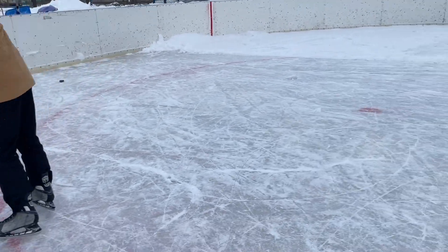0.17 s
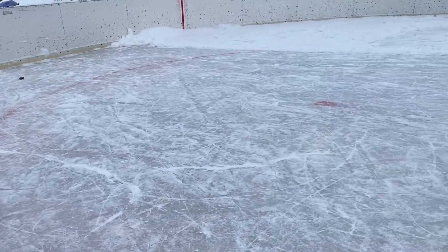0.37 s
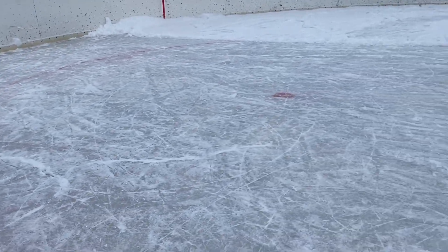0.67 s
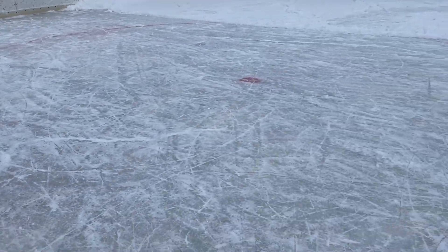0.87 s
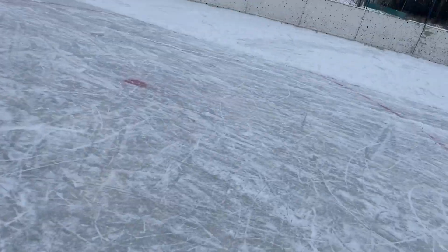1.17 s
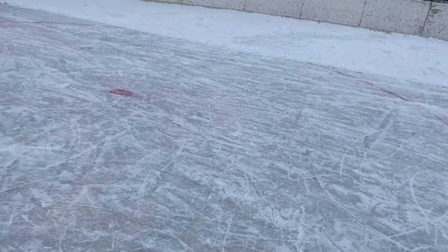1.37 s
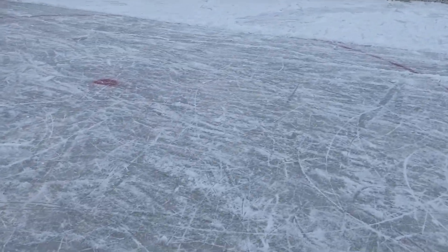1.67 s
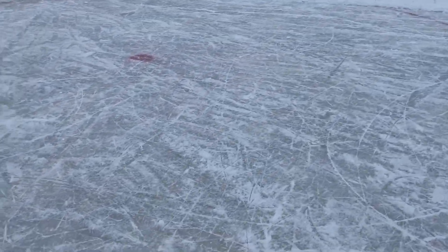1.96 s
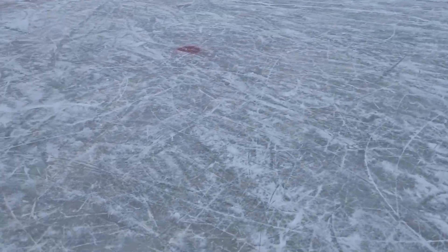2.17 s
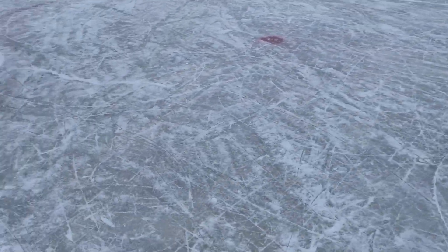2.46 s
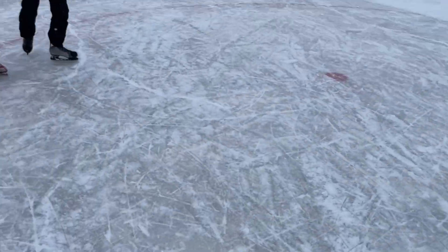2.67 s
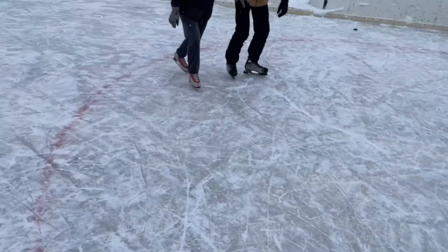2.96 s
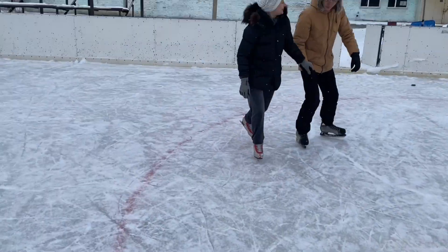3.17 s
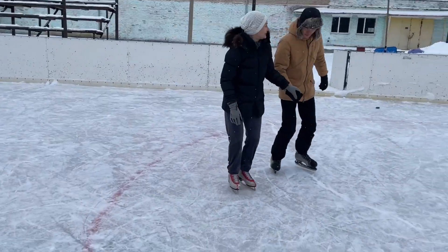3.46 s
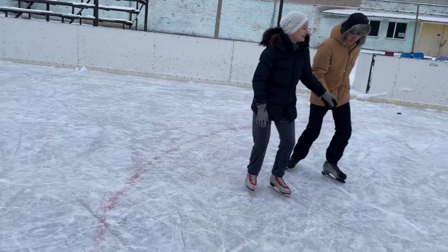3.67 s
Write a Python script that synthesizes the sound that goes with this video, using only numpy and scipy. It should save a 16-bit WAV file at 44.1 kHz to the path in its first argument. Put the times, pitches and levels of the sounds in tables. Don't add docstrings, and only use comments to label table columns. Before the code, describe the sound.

Skates scraping on outdoor ice in slow strokes, with dull thuds, ticks and a steady faint hiss.

```python
import sys
import numpy as np
from scipy import signal
from scipy.fft import rfft, irfft, next_fast_len
from scipy.io import wavfile
from scipy.ndimage import uniform_filter1d

SR = 44100
rng = np.random.default_rng(int(sys.argv[2]) if len(sys.argv) > 2 else 0)


def int16_out(signal):
    q = np.round(np.clip(np.atleast_2d(signal).T, -1, 1) * 32767)
    wavfile.write(sys.argv[1], SR, q.astype(np.int16))


def convert_level_to_amplitude(level_db):
    exponent = np.asarray(level_db, float) / 20
    return 10 ** exponent


N = 167580
TIME = np.arange(N) / SR

# (frequency [Hz], density [dB per Hz])
RINK_SPECTRUM = [(60, -16.5), (200, 1.5), (500, 1), (1200, -2.5), (2800, -8), (5800, -16.5), (9500, -17.5),
                 (15500, -40)]


def colour(x, points):
    n = next_fast_len(N + 8192)
    hz, db = np.array(points, float).T
    bins = np.log(np.arange(n // 2 + 1) * SR / n + 1)
    log_gain = np.interp(bins, np.log(hz), db) * np.log(10) / 20
    cepstrum = irfft(log_gain, n)
    cepstrum[1:n // 2] *= 2
    cepstrum[n // 2 + 1:] = 0
    y = irfft(rfft(x, n) * np.exp(rfft(cepstrum)), n)[..., :N]
    return y / np.sqrt(np.mean(y ** 2))


def walk(rate):
    hold = max(int(SR / rate), 2)
    levels = np.repeat(rng.standard_normal(N // hold + 1), hold)
    return 1.48 * uniform_filter1d(levels, hold)[:N]


def chips(rate, spread_db, hiss, patchy_db, wide):
    chance, size = rng.random((2, 3, N))
    height = convert_level_to_amplitude(spread_db * np.minimum(-np.log(1 - size), 2.5))
    sign = np.sign(np.sin(1e4 * size))
    x = (chance < rate / SR) * height * sign
    x = x / x.std() + hiss * rng.standard_normal((3, N))
    patches = convert_level_to_amplitude(patchy_db * (.6 * walk(60) + walk(190)))
    return (x[0] + wide * x[1:]) * patches


def envelope(start, length, db, crest, slope_db):
    bite_s, lift_s = .005, .0034
    t, crest = TIME - start, np.clip(crest, .02, .98)
    swell = np.interp(t / length, [0, crest, 1], [-slope_db, 0, -slope_db])
    bite = np.clip(t / bite_s + .5, 0, 1)
    lift = np.exp(np.minimum(length - t, 0) / lift_s)
    return convert_level_to_amplitude(db + swell) * bite * lift


def ring(x, hz, width):
    peak = signal.iirpeak(hz, hz / width / 1.5, SR)
    y = signal.lfilter(*peak, signal.lfilter(*peak, x))
    return y / y.std()


def echo(x, db):
    samples = np.arange(N)
    late = [np.interp(samples - .00056 * SR, samples, v) for v in x]
    return x - convert_level_to_amplitude(db) * np.array(late)


def strokes():
    # (start [s], length [s], level [dB], crunch of the sheet [dB], place of the crest [0-1])
    stroke_rows = [(0, 0.055, -34.5, -36, 0.06), (0.107, 0.075, -37, -10, 0.2), (0.262, 0.28, -49, 9, 0.64),
                   (0.568, 0.25, -43.5, -3, 0.02), (0.779, 0.085, -46.5, 10.5, 0.07),
                   (1.227, 0.15, -45, 4, 0.11), (1.407, 0.16, -46, 2, 0.5), (1.797, 0.2, -37.5, 2.5, 0.6),
                   (1.954, 0.2, -39, 1.5, 0.72), (2.154, .13, -40.5, -2, 0.74),
                   (2.277, 0.13, -41.5, 5, 0.26), (2.449, 0.085, -41.5, -11, 0.06),
                   (2.529, 0.048, -38, -1.5, 0.87), (2.606, 0.073, -44, 9.5, 0.68),
                   (2.711, 0.064, -32.5, -0.5, 0.2), (2.788, 0.15, -37.5, -15, 0.54),
                   (2.992, 0.075, -38, -4, 0.94), (3.063, 0.039, -33, -4, 0.63),
                   (3.262, 0.12, -40, -25, 0.4), (3.326, 0.082, -44.5, -3, 0), (3.427, 0.14, -36, 0, 0.42),
                   (3.55, 0.11, -36.5, 0.5, 0.64), (2.677, 0.037, -34.5, -1, 0.46)]
    crunch_hz = [510, 676, 554, 540, 650, 1020, 910, 604, 446, 450, 353, 457, 350, 390, 1190, 414, 970,
                 1080, 496, 680, 740, 650, 450]
    edge_hz = [2600, 4400, 2600, 2600, 4400, 5500, 2600, 1860, 4900, 4600, 4730, 1540, 2700, 2600, 4200,
               2480, 2500, 2280, 2140, 3400, 2600, 1430, 4300]
    hiss_db = [-7.5, -3, 2.2, 0.8, 3.5, 3.1, 4, .1, 1.5, .1, .1, 8.5, .1, 6.5, 0.5, 2, 0.5, -1, -1.5, -2.5,
               -1, -1, .1]
    # (frequency [Hz], density [dB per Hz])
    shave_spectrum = [(300, -27.5), (900, -8), (2500, -12.5), (4500, -12), (6000, -23.5), (9500, -18),
                      (12000, -30), (16000, -19.5)]
    # (frequency [Hz], width [Hz], level [dB])
    boot_modes = [(334, 210, -0.5), (1360, 1050, -2.5), (2600, 300, -20), (4400, 1100, -17)]
    crunch_q, edge_q, edge_db, slope_db = 2.2, 6.0, -7.5, 7.5

    air = colour(chips(6000, 2.1, 0.99, 3.0, 1.0), shave_spectrum) * convert_level_to_amplitude(-6.5)
    coarse = chips(600, 4.3, 0.24, 1.67, 0.69)
    sheet = chips(300, 3.8, 0.43, 1.4, 0.6)
    for k, (hz, width, db) in enumerate(boot_modes):
        air = air + convert_level_to_amplitude(db - 3.5) * ring(np.roll(coarse, 5000 * k, axis=1), hz, width)
    hiss_level = sum(envelope(start, length, db + 3.0 + hiss, crest, slope_db)
                     for (start, length, db, _, crest), hiss in zip(stroke_rows, hiss_db))
    out = echo(air, -7) * hiss_level

    for (start, length, db, crunch_db, crest), low_hz, top_hz in zip(stroke_rows, crunch_hz, edge_hz):
        a, b = max(int((start - .05) * SR), 0), int((start + length + .15) * SR)
        body = ring(sheet[:, a:b], low_hz, low_hz / crunch_q)
        edge = ring(coarse[:, ::-1][:, a:b], top_hz, top_hz / edge_q)
        level = envelope(start, length, db, crest, slope_db)[a:b]
        out[:, a:b] += (convert_level_to_amplitude(crunch_db) * body + convert_level_to_amplitude(edge_db) * edge) * level
    return out


def skid():
    # (start [s], length [s], level [dB], place of the crest [0-1], brightness [dB])
    skid_rows = [
        (0.817, 0.061, -34.5, 1, -4.5),
        (0.882, 0.028, -29.5, 0.34, -2.5),
        (0.91, .071, -24.5, 0.4, 2.6),
        (0.976, 0.025, -32, 0.6, -4),
        (0.997, 0.051, -30, 0.25, -7.5),
        (1.05, 0.051, -32, 0.16, -0.5),
        (1.095, 0.089, -41, 0, -4),
    ]
    # (frequency [Hz], density [dB per Hz])
    skid_spectrum = [(200, -8), (500, 16), (1200, 7.5), (2400, 10), (4500, 7), (6000, -3.5), (9500, 1.5),
                     (12500, -7)]
    # (frequency [Hz], width [Hz], level [dB])
    skate_modes = [(952, 133, -0.5), (2064, 240, -1), (2500, 390, 3.5), (4400, 550, 3), (7600, 2200, -1)]

    x = colour(echo(chips(4000, 1.3, 0.56, 1.4, 0.74), -5), skid_spectrum)
    drive = chips(2500, 2.5, .5, 2.4, .4)
    for k, (hz, width, db) in enumerate(skate_modes):
        x = x + convert_level_to_amplitude(db - 6.5) * ring(np.roll(drive, 5000 * k, axis=1), hz, width)
    low = signal.sosfilt(signal.butter(4, 1600, fs=SR, output="sos"), x)
    high = signal.sosfilt(signal.butter(4, 1600, "high", fs=SR, output="sos"), x)
    out = np.zeros((2, N))
    for start, length, db, crest, bright_db in skid_rows:
        tilted = low / convert_level_to_amplitude(bright_db / 2) + high * convert_level_to_amplitude(bright_db / 2)
        out += tilted * envelope(start, length, db, crest, 6)
    return out * convert_level_to_amplitude(np.array([[.7], [-.7]]))


def chirps(rows, sweep, fall, rise, cycles, crack):
    out = np.zeros(N + 8192)
    t = np.arange(8192) / SR
    grits = signal.lfilter([.6], [1, -.8], rng.standard_normal((len(rows), 8192)))
    for (start, db, hz), grit in zip(rows, grits):
        turns = hz * t
        phase = turns + sweep * fall * (1 - np.exp(-turns / fall))
        wave = np.sin(2 * np.pi * phase) + crack * grit
        wave = wave * (1 - np.exp(-turns / rise)) ** 2 * np.exp(-turns / cycles)
        a = int(start * SR)
        out[a:a + 8192] += convert_level_to_amplitude(db) * wave / np.abs(wave).max()
    return out[:N]


def thuds():
    # (time [s], peak level [dB], pitch [Hz])
    thud_rows = [(0.237, -35, 113), (0.292, -32, 82), (0.478, -25.5, 188), (.532, -28.5, 111),
                 (.585, -32.5, 130), (.618, -39, 256), (.65, -34, 120), (0.488, -20.5, 88),
                 (0.551, -17.5, 238), (0.678, -31, 140), (0.782, -37, 174), (1.421, -27, 139),
                 (1.435, -26.5, 99), (1.467, -34, 80.5), (1.811, -33, 156), (1.838, -26.5, 260),
                 (1.987, -22, 288), (2.067, -24, 227), (2.309, -25.5, 238), (2.349, -23.5, 203),
                 (2.382, -27.5, 80), (2.649, -27, 340), (2.763, -33, 73.6), (2.872, -25.5, 390),
                 (3.206, -34.5, 190), (3.483, -29, 414), (3.508, -26.5, 180), (3.57, -27, 260),
                 (3.698, -30.5, 410), (3.747, -39, 300), (3.491, -30, 298), (1.826, -33, 109),
                 (2.915, -33, 316), (2.398, -28, 232), (3.785, -32.5, 344)]
    x = convert_level_to_amplitude(3) * chirps(thud_rows, .5, .6, .35, .8, 0)
    return np.array([1.1 * x, .9 * np.roll(x, -14)])


def ticks():
    # (time [s], peak level [dB], pitch [Hz])
    tick_rows = [(0.126, -27, 1040), (.918, -17, 991), (1.062, -22, 972), (2.685, -29, 4300),
                 (2.518, -28, 1900), (2.787, -34, 4700), (2.802, -29, 2500), (3.704, -33, 4000),
                 (3.786, -34, 3000), (2.724, -19, 1310), (2.735, -18, 1230), (0.677, -29, 1170),
                 (0.885, -20, 1360), (1.006, -13, 974), (1.308, -25, 1100), (1.485, -23, 988),
                 (1.523, -24, 993), (1.669, -24, 964), (1.814, -23, 713), (2.451, -19, 891),
                 (2.476, -22, 700), (2.495, -28, 1860), (2.562, -25, 1200), (2.623, -30, 4400),
                 (2.698, -20, 1360), (2.846, -24, 996), (3.063, -21, 1130), (3.207, -27, 1250),
                 (3.323, -29, 907), (3.416, -22, 853), (3.444, -27, 794), (3.698, -30, 703),
                 (3.784, -29, 703)]
    return chirps(tick_rows, .25, 1, .4, 1.9, .2)


def tail(source):
    level = signal.lfilter([.02], [1, -.98], np.abs(source))
    return .6 * level * colour(rng.standard_normal((2, N)), RINK_SPECTRUM)


def singing():
    # (start [s], length [s], pitch [Hz], level [dB])
    song_rows = [(1.79, .06, 4150, -48), (1.9, .14, 4150, -46), (1.91, .21, 4900, -47),
                 (1.82, .14, 1820, -44), (1.81, .09, 2450, -46), (2.08, .04, 1100, -43),
                 (2.712, .05, 1280, -37), (2.715, .045, 4500, -43), (3.41, .09, 800, -41),
                 (3.58, .06, 780, -41), (.915, .065, 2250, -35), (.93, .05, 4400, -38),
                 (1.02, .09, 975, -36), (3.058, .044, 1120, -39), (2.61, .06, 400, -42),
                 (1.22, .08, 5800, -50), (3.06, .042, 2250, -43), (3.345, .015, 6400, -49),
                 (3.47, .03, 6900, -49)]
    out, drive = np.zeros((2, N)), chips(990, 0.8, 0.38, 1.2, 0.15)
    for k, (start, length, hz, db) in enumerate(song_rows):
        a, b = int((start - .05) * SR), int((start + length + .05) * SR)
        tone = ring(np.roll(drive, 7000 * k, axis=1)[:, a:b], hz, hz / 20)
        out[:, a:b] += tone * envelope(start, length, db, 0.21, 3.3)[a:b]
    return out


def blade():
    # (frequency [Hz], level [dB], 60 dB decay time [s])
    blade_modes = [(3150, -40, 0.16), (4100, -42, 0.19)]
    t = np.maximum(TIME - 3.323, 0)
    return sum(convert_level_to_amplitude(db - 60 * t / t60) * np.sin(2 * np.pi * hz * t) for hz, db, t60 in blade_modes)


def glide():
    # (time [s], rumble level [dB])
    weight = [(0, -44), (.28, -46.5), (.43, -46.5), (.55, -37.5), (.92, -48.5), (1.04, -45.5), (1.2, -43.5),
              (1.37, -45), (1.6, -47.5), (1.83, -43.5), (2.001, -47), (2.23, -54), (2.369, -36),
              (2.46, -61), (2.84, -56), (3.3, -53.5), (3.69, -47), (3.8, -53)]
    # (frequency [Hz], density [dB per Hz])
    rumble_spectrum = [(25, -75), (45, -0.5), (75, 2), (130, -3), (250, -8.5), (500, -46.5)]
    times, db = np.array(weight).T
    bumps = colour(chips(220, 3.9, 0.16, 0.73, 0.21), rumble_spectrum)
    return bumps * convert_level_to_amplitude(np.interp(TIME, times, db) + 3.0)


def rink():
    far = chips(2500, 3.0, 1.2, 1.5, 1.1)
    fade_db = np.interp(TIME, [2.2, 3.34], [0, -5])
    return colour(far, RINK_SPECTRUM) * convert_level_to_amplitude(-39.5 + fade_db)


def scene():
    edge_ticks = ticks()
    near_blades = strokes() + skid() + singing() + blade()
    return near_blades + thuds() + edge_ticks + tail(edge_ticks) + glide() + rink()


def roll_off(x):
    return signal.sosfilt(signal.butter(12, 15800, fs=SR, output="sos"), x)


def record(dry):
    # (frequency [Hz], lead of the right one [half turns])
    port_phase = [(5900, 0), (7650, .98), (8650, 1.04), (10700, 1.93), (11000, 2.), (12350, 2.),
                  (13950, 2.99), (17000, 3.)]
    # (frequency [Hz], level [dB])
    left_lift = [(900, 0), (2500, 1.5), (5000, 3.5), (6100, 1)]
    # (start [s], length [s])
    apart_moments = [
        (1.785, .015),
        (2.43, .02),
        (2.55, .025),
        (2.705, .02),
        (2.787, .005),
        (3.145, .015),
        (3.352, .025),
        (3.425, .012),
    ]
    hz, (left, right) = np.arange(N // 2 + 1) * SR / N, rfft(dry)
    lift = convert_level_to_amplitude(np.interp(hz, *np.array(left_lift).T) / 2)
    top = 1 / (1 + (6900 / (hz + 1)) ** 20)
    turn = np.exp(.5j * np.pi * np.interp(hz, *np.array(port_phase).T))
    separate = np.array([left * lift, right / lift]) * (1 - top)
    shared = top * left * np.array([1 / turn, turn])

    apart_level = sum(envelope(start, length, -7, .5, 2) for start, length in apart_moments)
    apart_level = apart_level + convert_level_to_amplitude(-28 + 5 * walk(25))
    apart = apart_level * irfft(top * np.array([right, -right * turn ** 3]), N)
    return roll_off(irfft(separate + shared, N) + apart)


dry = scene()
out = record(dry)
int16_out(out)
```